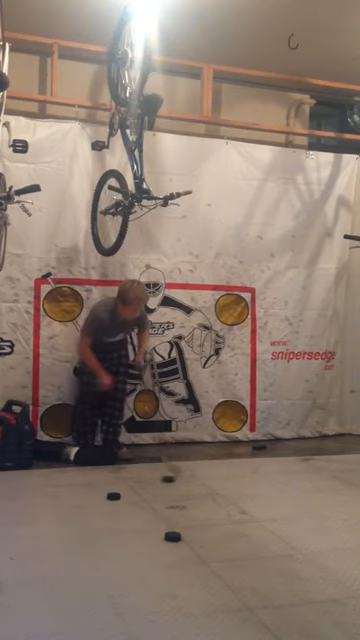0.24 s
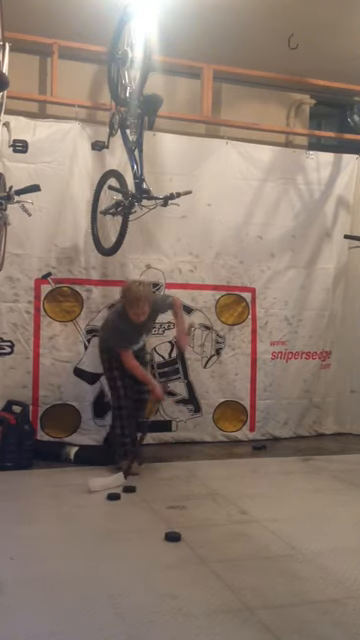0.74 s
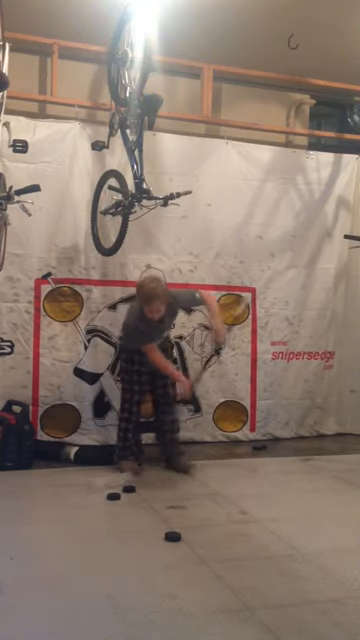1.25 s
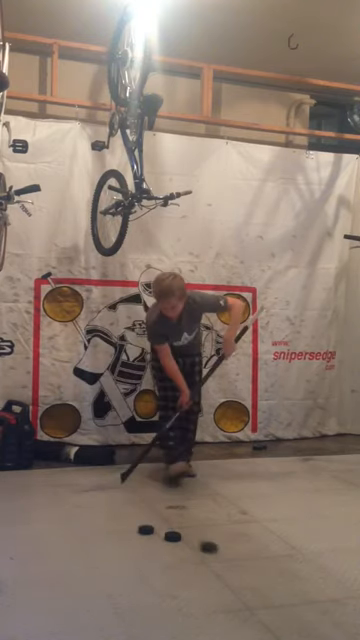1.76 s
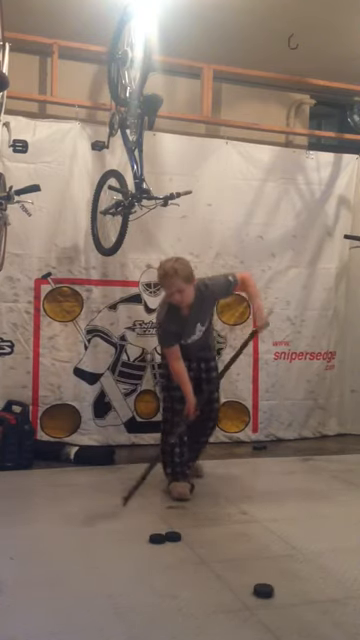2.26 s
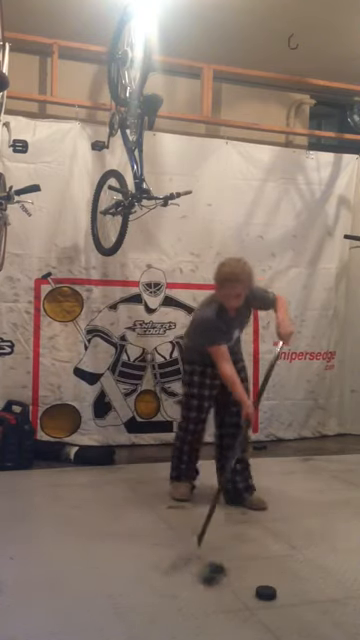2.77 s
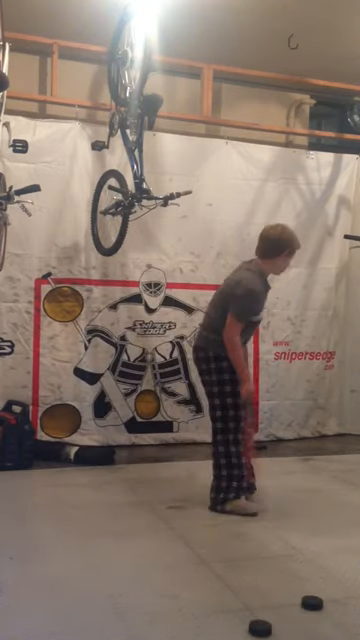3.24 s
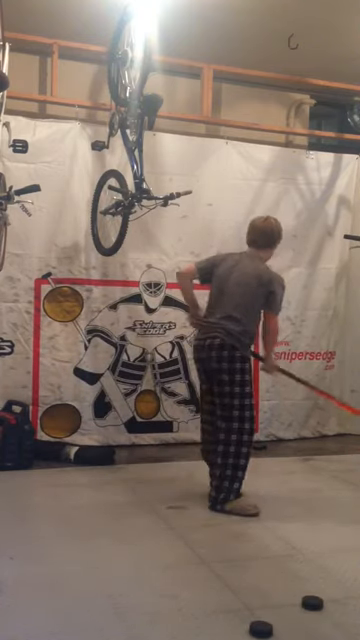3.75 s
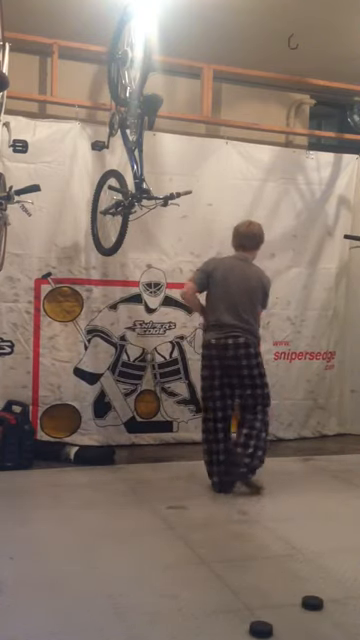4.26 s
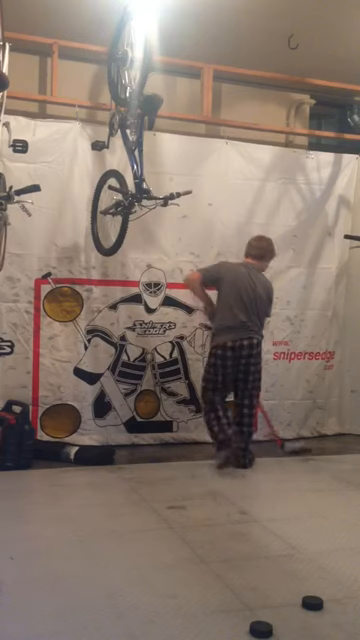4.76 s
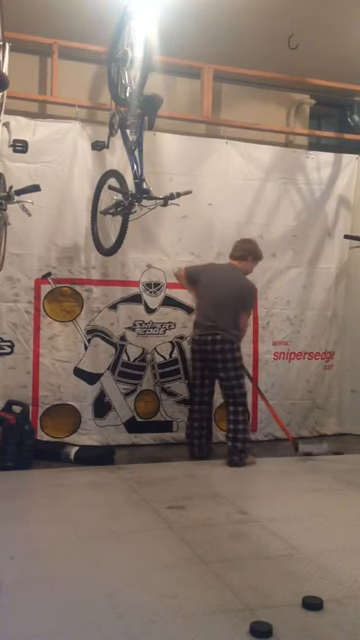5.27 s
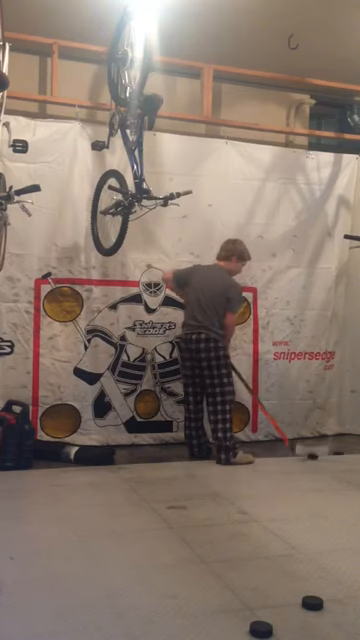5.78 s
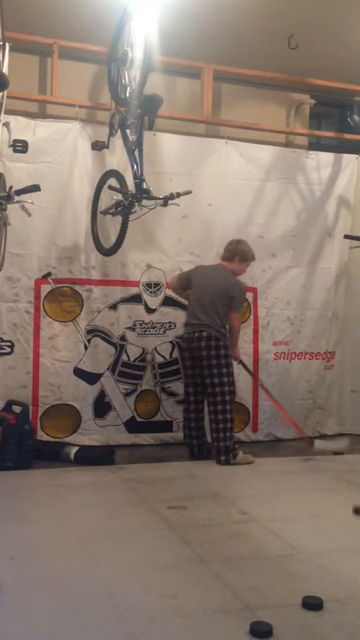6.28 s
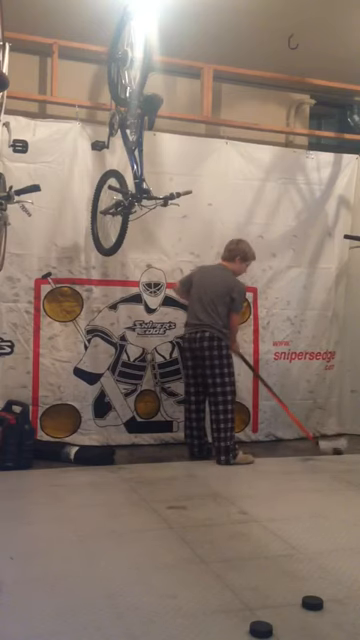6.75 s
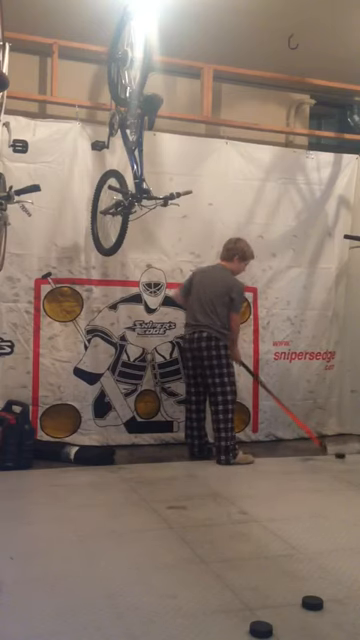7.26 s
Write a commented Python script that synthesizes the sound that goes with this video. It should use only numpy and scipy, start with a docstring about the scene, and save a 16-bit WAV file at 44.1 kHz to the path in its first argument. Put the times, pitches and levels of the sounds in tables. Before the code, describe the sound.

In a bare, reverberant garage, a stick raps pucks on a hard plastic floor with hollow knocks and woody clacks. Pucks rumble and hiss as they slide. A heavier boomy thud comes before a quieter stretch of soft brushing, steps and a faint squeak. Then a rattling metal bang sounds further off, followed by more taps and scrapes and a second bang. The microphone stays a few metres away, later about six.

```python
"""In a bare garage, hockey pucks are knocked and pushed over a hard plastic floor with a stick.
Blows are short pulses through the resonances of floor panels and blade, plus a ringing shaft.
Pushed or gliding pucks rumble and hiss (shaped noise), among soft steps, brushing and a faint squeak.
Two pucks bang into ringing metal further off, heavy thuds boom, and the walls answer with fading noise."""
import sys
import numpy as np
from scipy import signal
from scipy.fft import rfft, irfft, next_fast_len
from scipy.io import wavfile
from scipy.ndimage import map_coordinates

SR = 44100
rng = np.random.default_rng(int(sys.argv[2]) if len(sys.argv) > 2 else 0)


def dump_mix(stems):
    """Bounce the given channels to the path in sys.argv[1] as a 16-bit WAV at rate SR."""
    frames = np.atleast_2d(stems).T  # one column per channel
    limited = np.clip(frames, -1, 1)  # hard clip at full scale
    pcm = np.round(limited * 32767).astype(np.int16)
    wavfile.write(sys.argv[1], SR, pcm)


N = 331632
TIME = np.arange(N) / SR
AGE = np.arange(SR) / SR  # time since a blow, in seconds

# Stick and puck blows: t/s, floor knock level/dB, blade clack level/dB, edge snap level/dB, floor pitch f/Hz
STICK_BLOWS = [(0.001, -30.5, -28.5, -38, 577), (0.033, -29, -31, -51, 500), (0.067, -29, -37, -47, 533),
               (0.137, -28, -26, -37, 588), (0.42, -39, -65, -59, 513), (0.586, -39.5, -50.5, -56, 434),
               (0.632, -52, -48.5, -64.5, 370), (0.802, -19, -24, -36.5, 435),
               (0.867, -24.5, -36, -63, 456), (1.256, -40, -62.5, -71.5, 372),
               (1.396, -16, -26.5, -45, 409), (1.44, -24.5, -31, -46.5, 527),
               (1.472, -23, -34.5, -57.5, 430), (1.727, -20.5, -29, -44.5, 490),
               (2.089, -40, -54, -56.5, 374), (2.341, -26.5, -35, -50.5, 490),
               (2.397, -31, -42.5, -60.5, 424), (2.683, -18.5, -21, -37.5, 445),
               (2.831, -31.5, -43.5, -68, 435.4), (3.18, -37, -46, -56, 544), (3.246, -40.5, -52, -55, 500),
               (4.655, -36, -50, -65, 470), (5.019, -38, -58, -64, 596), (5.053, -37.5, -47, -65.5, 324),
               (5.117, -33.5, -47, -58, 395), (5.292, -41.5, -62, -68, 430),
               (5.323, -38.5, -55.5, -60, 460), (5.544, -20, -24, -39, 446), (5.857, -28, -28, -39.5, 624),
               (6.133, -23, -30.5, -43, 458), (6.427, -29, -44, -53, 523), (6.477, -37.5, -63, -62, 428),
               (6.714, -26.5, -31, -50.5, 500), (7.186, -26.5, -38, -56, 467),
               (7.283, -29.5, -42, -57, 470), (7.334, -28, -37, -54, 493), (7.379, -26, -32.5, -52, 458)]
# How far the stick works from the listener: t/s, distance/m
STICK_DISTANCE = [(0, 3.5), (0.8, 4.3), (1.6, 4.1), (2.7, 2.72), (5.2, 6.1), (7.5, 6.25)]
# Floor panel resonances, retuned for each spot: f/Hz, width/Hz, relative level/dB
PANEL_RESONANCES = [(302, 58, -3), (437, 60, 2), (599, 78, -2.5), (770, 312, -12)]
# Stick blade resonances: f/Hz, width/Hz, relative level/dB
BLADE_RESONANCES = [(956, 400, 0.5), (1600, 277, 4.5), (2263, 586, 0), (3614, 420, -1.5),
                    (4390, 1100, -9.5)]
# Stick shaft ringing: f/Hz, relative level/dB, time to fade by 60 dB/s
SHAFT_MODES = [(820, -4, .07), (1202, -1, .08), (1644, 0, .08), (1965, 0, .07), (2122, -2, .06),
               (2729, -3, .06), (2995, -8, .05), (3603, -5, .08), (4129, -10, .06), (5460, -18, .05)]
# Colour of the slab's thump, also used for bangs and heels: f/Hz, relative level/dB
THUMP_COLOUR = [(25, -35.5), (60, -23), (120, -4.5), (190, 5), (270, 2), (360, -1), (600, -35.5),
                (1500, -91)]
# Colour of the sharp snap of the edges: f/Hz, relative level/dB
SNAP_COLOUR = [(1500, -27.5), (3500, 6.5), (5000, 5.5), (7000, 1), (10000, -7.5), (15000, -17.5)]
ROOM_RADIUS_M = 4.26  # reference distance for the room sound and the thump
THUMP_DB, THUMP_LOSS_DB_PER_M = -14.5, 3  # thump against the knock at that distance, and its loss
LINGER_DB_PER_DB, LINGER_FROM_DB = 0.07, -27  # a blow harder than this gets more room sound
CONTACT_HZ, FIRM_DB, HARDENING = 3900, -24, 0.17  # top of a firm clack, its level, rise with level
SHAFT_DB = -12.5  # shaft ring against the blade clack


def blows(stick_room_db=1, edge_room_db=11):
    """Each blow drums the panel, thumps the slab, clacks the blade and rings the shaft; far ones are wetter."""
    track = np.zeros(N)
    thump, snap = click(THUMP_COLOUR), click(SNAP_COLOUR)
    for s, knock_db, clack_db, snap_db, spot_hz in STICK_BLOWS:
        metres = np.interp(s, *np.transpose(STICK_DISTANCE))
        distance_db = 20 * np.log10(metres / ROOM_RADIUS_M)
        room_db = distance_db + LINGER_DB_PER_DB * (knock_db - LINGER_FROM_DB)
        thump_db = knock_db + THUMP_DB - THUMP_LOSS_DB_PER_M * (metres - ROOM_RADIUS_M)
        # each spot of the floor has its own pitch
        tuning = spot_hz / PANEL_RESONANCES[1][0]
        knock = body(np.array(PANEL_RESONANCES) * [tuning, tuning, 1], low_hz=257.4, high_hz=1290)
        # a gentle touch sounds duller
        contact_hz = np.clip(CONTACT_HZ * amp(HARDENING * (clack_db - FIRM_DB)), 1500, 5000)
        clack = body(BLADE_RESONANCES, low_hz=590, high_hz=contact_hz)
        shaft = low_cut(ring(SHAFT_MODES), cut_hz=500)
        floor_path = garage(room_db)
        stick_path = garage(room_db + stick_room_db)
        edge_path = garage(room_db + edge_room_db)  # the edges get the most room sound
        parts = [
            (knock, floor_path, knock_db),
            (thump, floor_path, thump_db),
            (clack, stick_path, clack_db),
            (snap, edge_path, snap_db),
            (shaft, stick_path, clack_db + SHAFT_DB),
        ]
        add(track, s, sum(amp(level_db) * punch(through(path, pulse)) for pulse, path, level_db in parts))
    return track


# The blade pushes a puck: t/s, time to release/s, rumble level/dB, edge scrape level/dB, face hiss level/dB
PUCK_PUSHES = [(0.5, 0.073, -39, -61, -66.5), (0.597, 0.27, -41, -47.5, -54.5),
               (1.05, 0.15, -38.5, -58, -70.5), (1.2, 0.14, -36.5, -56, -74),
               (1.315, 0.38, -41, -48.5, -51), (2.6, 0.17, -36.5, -54, -51.5), (5.77, 0.28, -40, -64, -67),
               (6.2, 0.22, -34.5, -49, -56), (6.415, 0.25, -54, -53, -51.5)]
# A free puck glides: t/s, time to rest/s, rumble level/dB, edge scrape level/dB, face hiss level/dB
PUCK_GLIDES = [(0.136, 0.63, -38, -43, -48.5), (1.726, 1.03, -41, -43, -49.5),
               (2.342, 1.5, -51.5, -49.5, -56.5), (2.77, 1.07, -41.5, -48, -53),
               (4.64, 1.15, -68, -60, -55), (6.714, 0.61, -50, -46.5, -53.5)]
# Panel resonances under a sliding puck or a sole: f/Hz, width/Hz, relative level/dB
RUMBLE_RESONANCES = [(335.7, 49.5, 0), (414, 55, 0.5), (555, 140, -7)]
# Colour of the scraping edges: f/Hz, relative level/dB
SCRAPE_COLOUR = [(100, -34), (200, 2.5), (700, 8.5), (1200, 3), (2600, -2.5), (4500, -22), (8000, -25.5),
                 (15000, -51.5)]
# Colour of the hissing smooth faces: f/Hz, relative level/dB
HISS_COLOUR = [(1500, 1.5), (4000, 9.5), (7000, 3.5), (11000, -2.5), (15500, -10)]
BUMPS_PER_S = 110  # average number of floor bumps met in a second


def sliding(pressure_db=-0.9):
    """Pucks bump over the floor's grain: the panel rumbles, the edges scrape, the smooth faces hiss."""
    rumble, scrape, hiss = np.zeros((3, N))
    for moves, shape in [(PUCK_PUSHES, push), (PUCK_GLIDES, glide)]:
        for s, length_s, rumble_db, scrape_db, hiss_db in moves:
            motion = shape(length_s)
            add(rumble, s, amp(rumble_db) * motion)
            add(scrape, s, amp(scrape_db) * motion)
            add(hiss, s, amp(hiss_db) * motion)
    # bumps come at random moments with random strengths
    bumps = (rng.random(N) < BUMPS_PER_S / SR) * rng.uniform(-1, 1, N)
    shaken_panel = through(bumps, body(RUMBLE_RESONANCES, low_hz=168, high_hz=784))
    panel = unit(through(shaken_panel, garage(room_db=-6.5)))
    pressure = amp(pressure_db * wobble(22))
    return rumble * panel + pressure * (scrape * noise(SCRAPE_COLOUR) + hiss * noise(HISS_COLOUR))


def push(length_s, attack_s=0.03, release_s=0.066):
    """The blade takes hold, keeps an even pace, then lets go."""
    taking_hold = 1 - np.exp(-TIME / attack_s)
    letting_go = np.exp(-np.maximum(TIME - length_s, 0) / release_s)
    return taking_hold * letting_go


def glide(length_s, attack_s=0.022, speed_law=1.57):
    """A free puck loses speed at a steady rate; its loudness is a power of the speed."""
    speed = np.maximum(1 - TIME / length_s, 0)
    return (1 - np.exp(-TIME / attack_s)) * speed ** speed_law


# Pucks against far metal: t/s, crash level/dB, ring level/dB, thump level/dB, relative room level/dB
METAL_BANGS = [(4.479, -29.5, -35, -40, 21), (4.523, -30, -40, -42, 6), (4.558, -33.5, -40.5, -41, 11),
               (6.641, -31.5, -29, -44.5, -1.5)]
# Colour of the crash: f/Hz, relative level/dB
CRASH_COLOUR = [(60, -24), (150, -17), (300, -13), (520, 7), (720, -4), (1500, 4.5), (2500, -1), (4100, -5),
                (4550, -26), (5000, -7.5), (5600, -20), (6000, -19.5), (15000, -53)]
# Ringing of the struck metal: f/Hz, relative level/dB, time to fade by 60 dB/s
METAL_MODES = [(580, -15, 0.64), (835, 8, 0.18), (1023, 6, 0.18), (1252, 8.5, 0.099), (1475, 10, 0.052),
               (1600, 3, 0.05), (2160, -24, 0.031), (2850, 4, 0.034), (3420, 8, 0.033), (3644, 2.5, 0.039),
               (4040, 11, 0.03), (5530, -3, 0.058)]
# Slow singing of the metal: f/Hz, relative level/dB, time to fade by 60 dB/s
SINGING_MODES = [(2640, 7, 0.59), (3240, -12.5, 6.9), (4240, -10, 2.1), (5230, -11, 1.6), (5630, -13, 1.1),
                 (6340, -22, 6.3)]


def bangs(sing_db=-17):
    """Hard hits crash, ring and thump, each with its own share of room sound; the metal sings on faintly."""
    track = np.zeros(N)
    for s, crash_db, ring_db, thump_db, room_db in METAL_BANGS:
        path = garage(room_db)
        parts = [
            (click(CRASH_COLOUR), crash_db),
            (low_cut(ring(METAL_MODES), cut_hz=520), ring_db),
            (click(THUMP_COLOUR), thump_db),
        ]
        add(track, s, sum(amp(level_db) * punch(through(path, pulse)) for pulse, level_db in parts))
    # the first hit also wakes the slowly fading modes
    s, crash_db = METAL_BANGS[0][:2]
    add(track, s, amp(crash_db + sing_db) * punch(ring(SINGING_MODES, size=SR)))
    return track


# Heavy blows that make the garage boom: t/s, level/dB
HEAVY_THUDS = [(0.631, -48), (1.734, -43), (2.707, -28), (6.716, -48.5)]
# Lowest modes of the wall: f/Hz, relative level/dB, time to fade by 60 dB/s
WALL_MODES = [(65.6, -12.5, 0.62), (86, -12.5, 0.76), (98, 2.5, .25), (118.6, 6, 0.33), (155, -11.5, 0.46)]


def thuds(attack_s=0.00716):
    """The wall booms in its lowest modes, with a soft start."""
    track = np.zeros(N)
    for s, db in HEAVY_THUDS:
        boom = ring(WALL_MODES, size=SR) * (1 - np.exp(-AGE / attack_s))
        add(track, s, amp(db) * punch(boom))
    return track


# Soft footsteps: t/s, panel level/dB, heel thump level/dB
FOOTSTEPS = [(0.626, -38, -37), (1.166, -44.5, -42), (1.892, -53, -38.5), (3.968, -55, -63),
             (4.207, -59.5, -68.5), (5.117, -55, -38), (5.322, -62, -45), (6.714, -58, -40)]


def steps(room_db=-8):
    """A soft sole presses the panel gently while the heel thumps the slab."""
    track = np.zeros(N)
    for s, panel_db, heel_db in FOOTSTEPS:
        path = garage(room_db)
        parts = [
            (body(RUMBLE_RESONANCES, low_hz=120, high_hz=498), panel_db),
            (click(THUMP_COLOUR), heel_db),
        ]
        add(track, s, sum(amp(level_db) * punch(through(path, pulse)) for pulse, level_db in parts))
    return track


# Soles and clothes brush as the player turns and walks: middle t/s, half-width/s, level/dB
BRUSHES = [(3.4, 0.22, -54), (3.99, 0.11, -56.5), (4.154, 0.11, -62), (5.114, 0.11, -53.5),
           (5.341, 0.17, -56)]
# Colour of the brushing: f/Hz, relative level/dB
BRUSH_COLOUR = [(300, 1), (1200, -3), (2800, 1), (5500, -5), (8000, -13.5), (15000, -29)]


def scuffs(uneven_db=1.2):
    """Each brush of soles and clothes is noise that swells and fades, a little unevenly."""
    envelope = sum(amp(db) * np.exp(-((TIME - s) / width_s) ** 2) for s, width_s, db in BRUSHES)
    return envelope * amp(uneven_db * wobble(35)) * noise(BRUSH_COLOUR)


# Faint squeak of a sole: middle t/s, f/Hz, level/dB before the room
SOLE_SQUEAKS = [(3.922, 2636, -51)]


def squeaks(waver=0.067):
    """A sole gives a brief chirp: a sine tone of unsteady pitch."""
    track = np.zeros(N)
    for s, hz, db in SOLE_SQUEAKS:
        phase = 2 * np.pi * np.cumsum(hz * (1 + waver * wobble(790))) / SR
        swell = np.exp(-.5 * ((TIME - s) / .012) ** 2)
        track += amp(db) * swell * np.sin(phase)
    return through(track, garage(room_db=-14))


# How long the garage rings at each pitch: f/Hz, time to fade by 60 dB/s
GARAGE_FADE = [(100, 0.85), (300, 0.45), (800, 0.63), (2000, 0.72), (5000, 0.68), (9000, 0.43),
               (15000, 0.37)]


def garage(room_db, walls_db=-5, build_s=0.00067, early_s=.02, hold_s=0.0073, count=12):
    """Sound path of direct sound, near walls, and a diffuse tail that holds briefly before it dies."""
    hz, t, z = signal.stft(rng.standard_normal(SR), SR, nperseg=256)
    fading = np.hypot(t, hold_s) - hold_s
    fade_gain = amp(-60 * fading / along(GARAGE_FADE, hz)[:, None])
    tail = signal.istft(z * fade_gain, SR, nperseg=256)[1][:SR]
    path = tail * (1 - np.exp(-AGE / build_s)) * amp(room_db - 24.5)
    # a few early echoes from the near walls
    delays = rng.uniform(.002, early_s, count)
    path[(delays * SR).astype(int)] += amp(walls_db) * rng.uniform(-1, 1, count)
    path[0] += 1  # direct sound
    return path


# Colour of the quiet air: f/Hz, relative level/dB
AIR_COLOUR = [(25, -8.5), (45, -8), (80, -1), (120, -0.5), (300, -3.5), (700, -15.5), (1200, -20.5),
              (3000, -11), (8000, -21), (15500, -22.5)]


def air(level_db=-63.5):
    """The quiet air of the garage is steady coloured noise."""
    return amp(level_db) * noise(AIR_COLOUR)


def body(resonances, low_hz, high_hz, size=8192):
    """Pulse of damped resonances; small area radiates no bass, contact time softens the top."""
    f = np.fft.rfftfreq(size, 1 / SR)
    gain = 0
    for k, (centre, width, db) in enumerate(resonances):
        sign = (-1) ** k  # neighbours move in opposite directions
        gain = gain + sign * amp(db) * 1j * f * width / (centre * centre - f * f + 1j * f * width)
    band = signal.butter(2, [low_hz, high_hz], "band", fs=SR, output="sos")
    return signal.sosfilt(band, irfft(gain))


def ring(modes, size=SR // 3, scatter_db=2):
    """Fading sine tones, struck at new strengths each time."""
    t = AGE[:size]
    sound = 0
    for hz, db, t60 in modes:
        level_db = db + scatter_db * rng.standard_normal() - 60 * t / t60
        sound = sound + amp(level_db) * np.sin(2 * np.pi * hz * t)
    return sound


def click(spectrum, size=4096):
    """The shortest pulse with this spectrum that starts at once (minimum phase)."""
    cepstrum = irfft(np.log(amp(along(spectrum, np.fft.rfftfreq(size, 1 / SR)))))
    # fold the backward half onto the forward half
    cepstrum[1:size // 2] *= 2
    cepstrum[size // 2 + 1:] = 0
    return irfft(np.exp(rfft(cepstrum)))


def noise(spectrum):
    """Coloured noise of rms 1."""
    return unit(through(rng.standard_normal(N), click(spectrum)))


def wobble(rate):
    """A smooth random curve, rate knots a second."""
    knots = rng.standard_normal(int(N * rate / SR) + 4)
    return map_coordinates(knots, [TIME * rate])


def low_cut(x, cut_hz):
    """Remove the bass below cut_hz."""
    return signal.sosfilt(signal.butter(2, cut_hz, "high", fs=SR, output="sos"), x)


def through(x, response):
    """Convolve, keeping the length."""
    return signal.fftconvolve(x, response)[:len(x)]


def along(points, hz):
    """Read (f/Hz, value) points on a log axis."""
    f, v = np.transpose(points)
    return np.interp(np.log(hz + 1), np.log(f + 1), v)


def amp(db):
    """Decibels to gain."""
    return 10 ** (np.asarray(db) / 20)


def unit(x):
    """Scale to rms 1."""
    return x / np.sqrt(np.mean(x ** 2) + 1e-20)


def punch(x, size=1800):
    """Scale a blow so that its first 1800 samples (41 ms) have rms 1."""
    return x / np.sqrt(np.mean(x[:size] ** 2) + 1e-20)


def add(track, s, sound):
    """Mix a sound into the track at time s, in seconds."""
    start = max(round(s * SR), 0)
    part = sound[:max(N - start, 0)]
    track[start:start + len(part)] += part


def scene():
    """All sources over the quiet air of the garage."""
    contacts = blows() + bangs() + thuds() + steps()
    friction = sliding() + scuffs() + squeaks()
    return (contacts + friction + air())[None]


def record(dry, top_hz=15500):
    """Keep nothing above the band limit."""
    size = next_fast_len(N + SR // 2)
    kept = np.fft.rfftfreq(size, 1 / SR) < top_hz
    return irfft(rfft(dry, size) * kept, size)[:, :N]


dry = scene()
out = record(dry)
dump_mix(out)
```